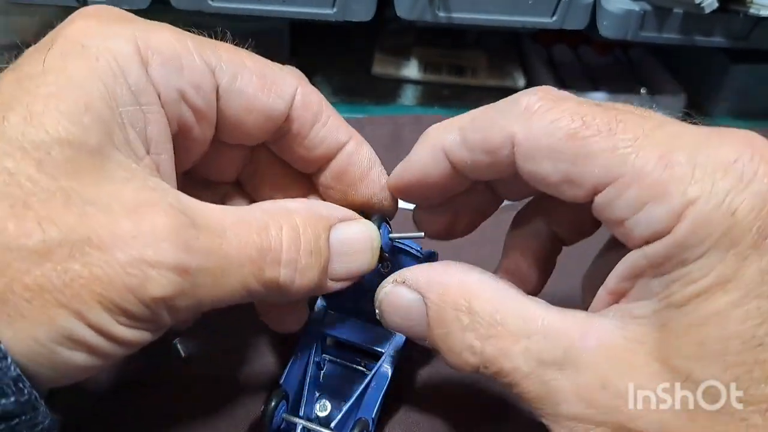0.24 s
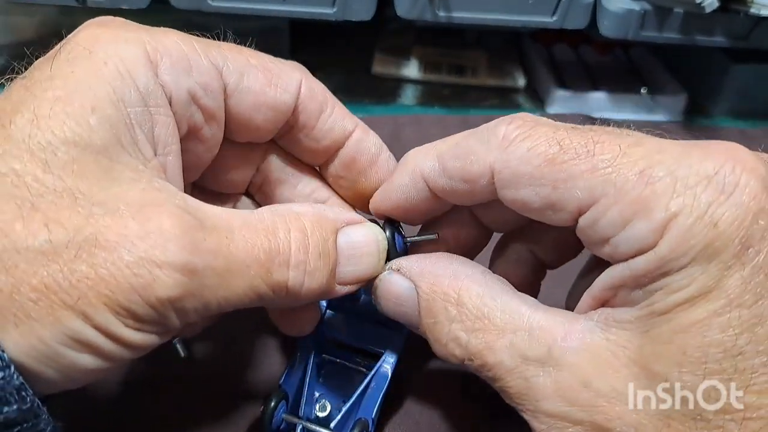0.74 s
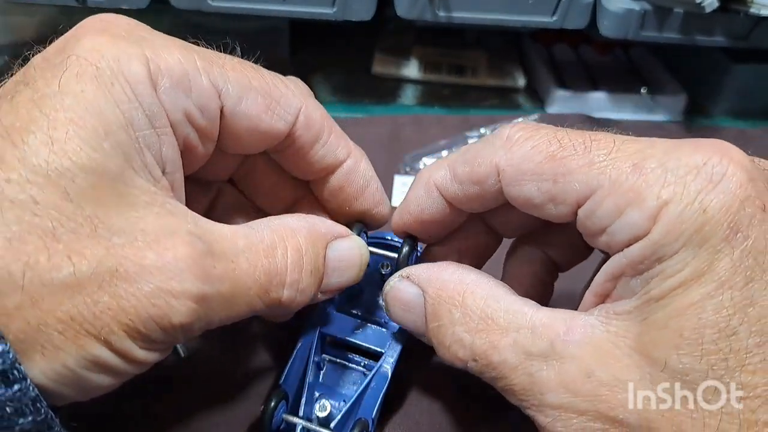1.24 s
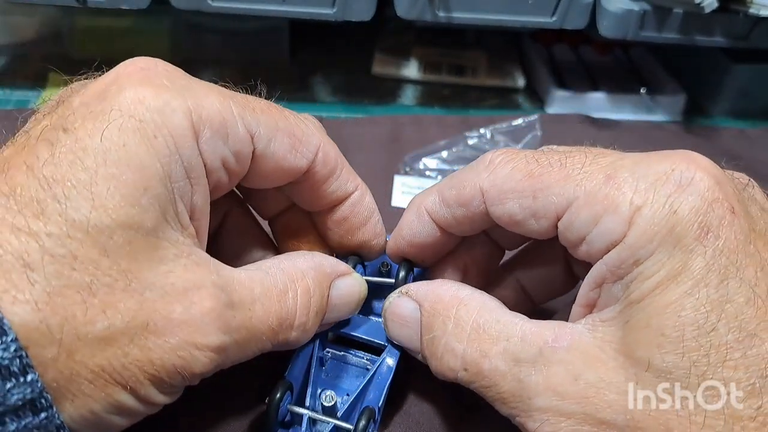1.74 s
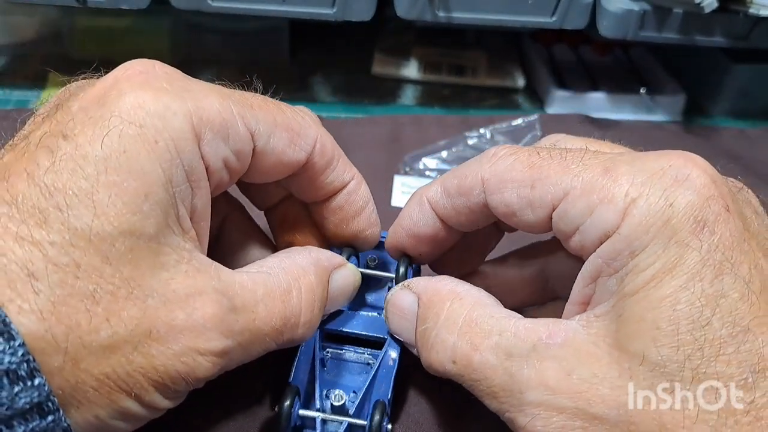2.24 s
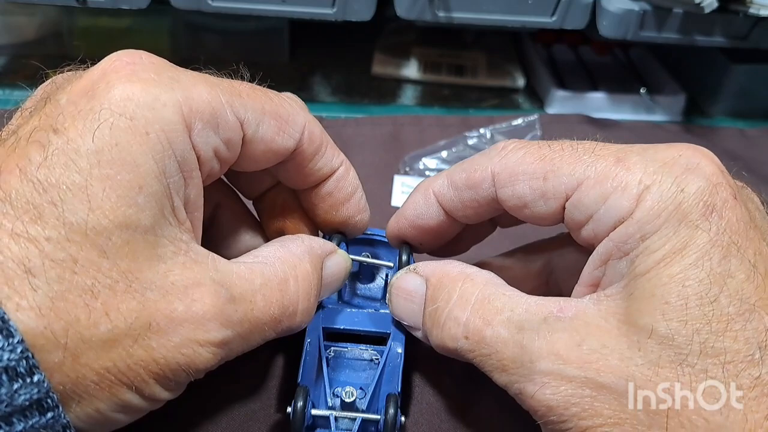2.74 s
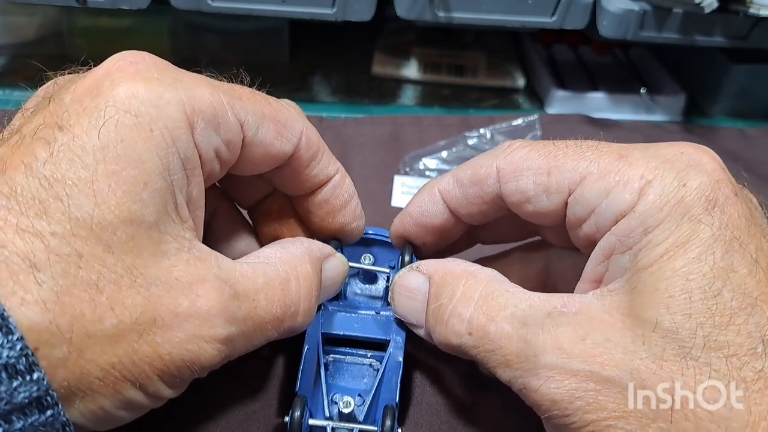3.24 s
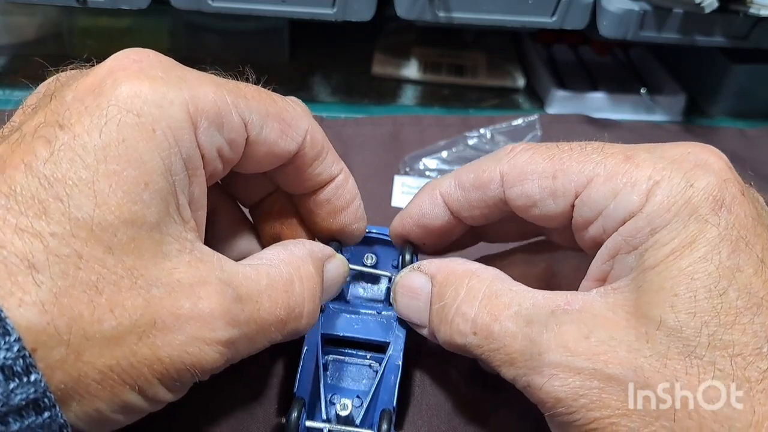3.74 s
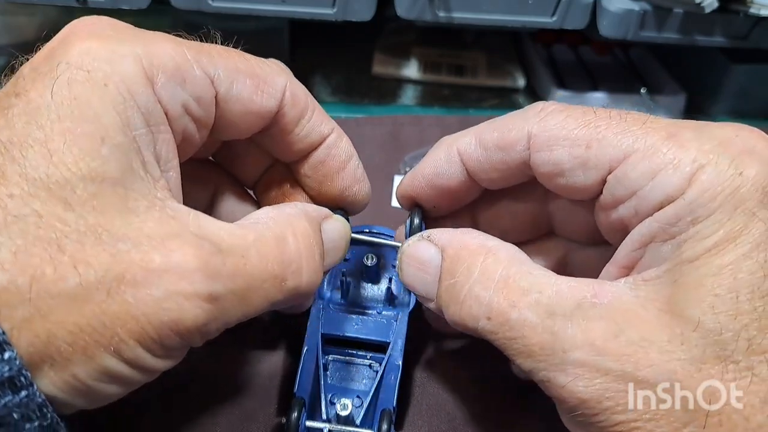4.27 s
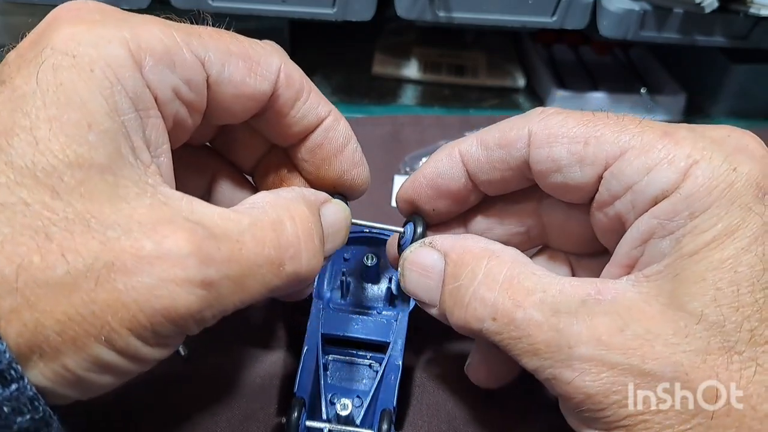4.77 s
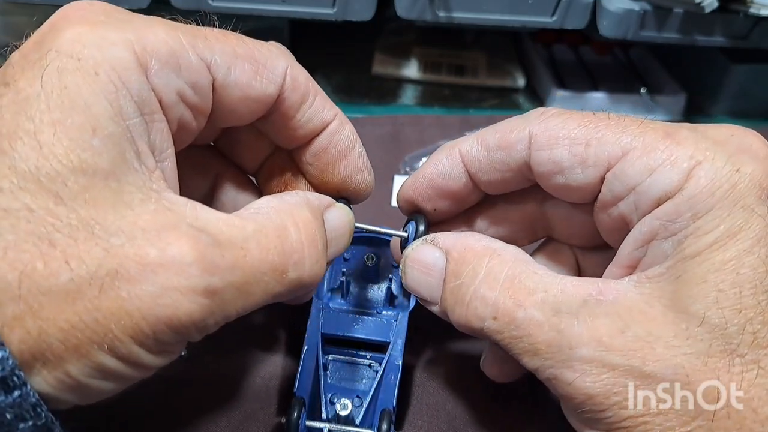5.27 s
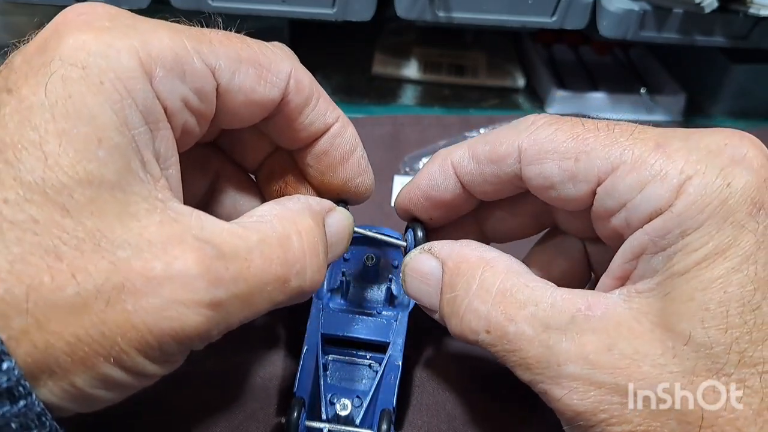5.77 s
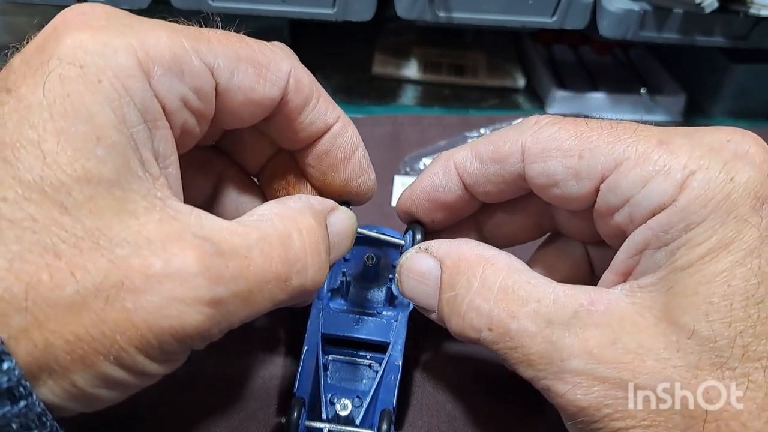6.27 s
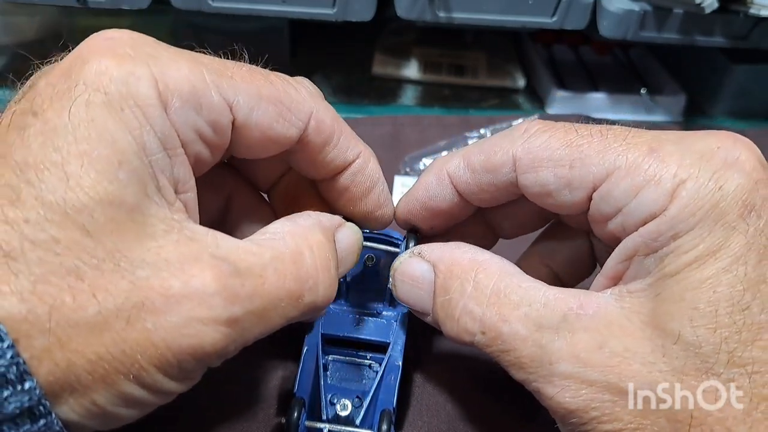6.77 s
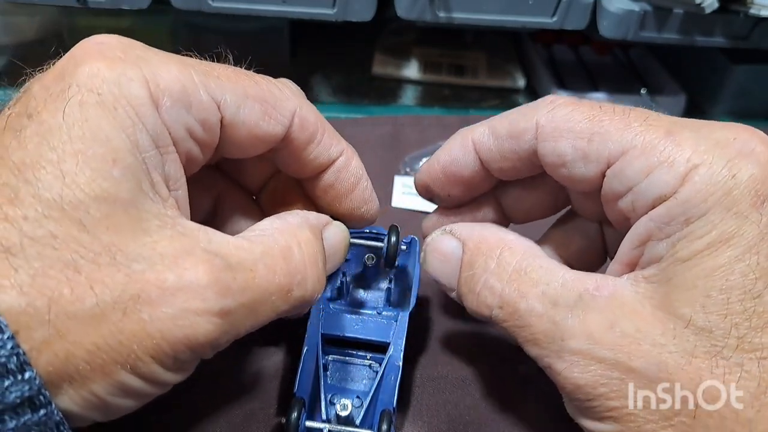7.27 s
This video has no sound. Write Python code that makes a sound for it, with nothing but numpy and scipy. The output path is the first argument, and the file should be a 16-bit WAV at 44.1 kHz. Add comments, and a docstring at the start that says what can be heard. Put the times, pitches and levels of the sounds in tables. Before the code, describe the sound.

Heavy rain drums and patters on a shed roof while small plastic parts tick at a workbench and fat drips ring a panel.

```python
"""Heavy rain on a shed roof, heard at a workbench underneath, in a small, dry room.
From the start, random drops drum and patter over a faint hiss, and big drops slap the roof: noise plus short notes.
The rain eases; a little after 1 s, plastic parts of a model car begin to tick as a wheel is pressed on:
bursts of noise and ringing sines. From about 2.3 s, fat drips also make a panel ring with sinking notes.
After about 3 s the rain swells unevenly and is strongest at the end."""
import sys
import numpy as np
from scipy import signal
from scipy.fft import rfft, irfft, next_fast_len
from scipy.io import wavfile

SR = 44100
rng = np.random.default_rng(int(sys.argv[2]) if len(sys.argv) > 2 else 0)


def materialize(psi):
    """Save the field psi as 16-bit PCM at rate SR to the path in sys.argv[1].

    A 1-D psi becomes a single channel; in a 2-D psi each row is a channel.
    """
    bounded = np.clip(np.atleast_2d(psi).T, -1, 1)
    quanta = np.round(bounded * 32767).astype(np.int16)
    wavfile.write(sys.argv[1], SR, quanta)


N = 331191

# Colour tables give the balance between pitches; their level/dB is per Hz and relative.
# strength of the shower: [t/s, level/dB], where USUAL_DB counts as usual
RAIN = [(0.0, -48), (0.54, -49), (0.84, -50), (1.27, -49.5), (1.63, -50), (1.72, -55), (2.53, -58),
        (2.72, -54.5), (2.81, -60), (2.92, -53.5), (3.07, -54), (3.43, -51), (3.6, -54.5), (3.72, -56.5),
        (3.81, -48.5), (3.87, -54.5), (3.99, -49.5), (4.16, -53), (4.27, -55), (4.33, -53.5), (4.46, -49),
        (4.55, -53.5), (4.62, -50.5), (4.79, -48), (4.83, -53), (4.9, -50), (5.46, -48), (5.75, -52.5),
        (5.96, -46), (6.11, -47), (6.63, -47), (7.51, -43.5)]
# deep drumming of the roof, colour: [f/Hz, level/dB]
DRUM = [(25, -23), (50, -4), (80, -6), (115, -1.5), (155, -0.5), (200, 2.5), (270, -4), (345, 3), (420, -4),
        (520, -9), (800, -17), (1600, -49.5)]
# patter in the middle range, colour: [f/Hz, level/dB]
PATTER = [(300, -20.5), (520, -9), (760, -6), (1020, 4.5), (1200, 4), (1450, 0), (1850, 4), (2700, -1.5),
          (3400, -9.5), (5000, -24), (9000, -69)]
# bright spray, colour: [f/Hz, level/dB]
SPRAY = [(1500, -3.5), (3200, 2.5), (5000, 1.5), (6300, -6.5), (7900, -9), (8900, -24), (12500, -24),
         (16000, -30)]
# ring of nearer drops at each pitch: [f/Hz, relative level/dB]
PLIP = [(600, -10.5), (1000, 0.5), (1400, -2.5), (1850, 4.5), (2600, -5.5), (3600, -5)]
# likeness of the two ears, 1 = identical: [f/Hz, coherence]
LIKENESS = [(60, 0.97), (140, 1), (300, 0.91), (450, 0.55), (640, -0.21), (1400, -0.096), (3000, 0.0044),
            (15000, -0.01)]
# big drops slapping the roof; the levels are relative to other rows, and slaps() trims each part:
# [t/s, slap level/dB, thump level/dB, spatter time/s, plip f/Hz, plip level/dB, plip left-right/dB]
SLAPS = [(0.204, -37.5, -37.5, 0.21, 1020, -50, -4), (0.325, -47, -69, 0.2, 1820, -27, -5),
         (0.351, -46, -63, 0.082, 2400, -39, -4), (0.3749, -42, -49, 0.18, 1820, -28.5, 0),
         (0.424, -41, -56, 0.18, 2740, -30, 0), (0.435, -50, -47.5, 0.14, 1220, -36, -2),
         (0.449, -42, -57, 0.14, 1700, -29, 0), (0.569, -37.5, -44.5, 1, 1862, -41, -1),
         (0.605, -43, -56, .2, 1300, -41, -3), (0.628, -47, -49, 0.19, 1604, -40, 1),
         (0.764, -56, -50.5, 0.09, 960, -68, -6), (0.852, -52, -67, 0.088, 1900, -38, -4),
         (0.984, -45.5, -54, 0.15, 1090, -41, -3), (1.025, -48, -60, 0.11, 1900, -40, 1),
         (1.056, -42.5, -68, 0.022, 1800, -32, 0), (1.13, -44, -64, 0.12, 1510, -32, -3),
         (1.2208, -43.5, -61, 0.1, 1110, -30, 0), (1.294, -48, -46.5, 0.046, 1800, -34, -5),
         (1.3187, -43.5, -46, 0.07, 1250, -30.5, 6), (1.378, -55, -53, .12, 1170, -35, -5),
         (1.406, -43.5, -49, 0.089, 1410, -30, -7), (1.4095, -51, -46.5, 0.14, 1520, -26, -8),
         (1.681, -46.5, -58, 0.13, 1720, -40, -4), (1.7, -44, -45.5, 0.53, 1840, -46, -6),
         (1.77, -42, -46, 0.27, 980, -40, -1), (1.797, -48.5, -47.5, .13, 1035, -40, -4),
         (1.978, -39, -44, 0.12, 980, -39, -4), (1.993, -41, -44.5, 0.24, 940, -35.5, -13),
         (2.047, -45, -42.5, 0.16, 1340, -30.5, -10), (2.231, -42, -52.5, 0.22, 1010, -60, -2),
         (2.277, -45.5, -58, .18, 1590, -33, -10), (2.386, -45, -46, 0.24, 1000, -36.5, -6),
         (2.408, -41.5, -41, 0.18, 1820, -37, -16), (2.527, -58, -49, 0.15, 1090, -56, -3),
         (2.6, -50, -51, 0.13, 1310, -46, -6), (2.681, -53, -61, 0.071, 2400, -47, -4),
         (2.705, -53, -56, 0.11, 1200, -42, -1), (2.8354, -51, -66, 0.28, 1150, -29.5, -5),
         (2.884, -45, -50, 0.11, 1808, -37, -15), (2.981, -54, -52.5, .12, 1200, -48, -2),
         (3.044, -47, -53, 0.067, 1410, -34.5, 0), (3.087, -50, -46, 0.054, 720, -48, -8),
         (3.263, -64, -59, .041, 1520, -38, -14), (3.301, -38, -49, 0.16, 1620, -42, -9),
         (3.404, -44, -46.5, 0.11, 1240, -38, 3), (3.472, -40, -51, 0.063, 1800, -32, -13),
         (3.481, -40.5, -44, 0.47, 1680, -29, -3), (3.55, -42.5, -46.5, 0.4, 1120, -35, -4),
         (4.096, -47, -48.5, 0.23, 1090, -41, -12), (4.364, -47, -62, 0.089, 1720, -40, 6),
         (4.401, -55, -60, .08, 1380, -43, -1), (4.586, -43, -45, 0.22, 1220, -40, -6),
         (4.608, -38.5, -47, 0.074, 1630, -23, -9), (4.767, -43.5, -47.5, 0.17, 1640, -46, 7),
         (4.849, -45.5, -49, .12, 1290, -50, -3), (4.903, -44.5, -51, 0.12, 1420, -30, -5),
         (4.925, -40.5, -43.5, 0.92, 1620, -35, 4), (4.942, -45, -50.5, 0.12, 920, -33, -6),
         (5.071, -47, -51.5, 0.053, 1780, -27.5, 0), (5.268, -45.5, -51.5, .06, 1890, -36, -7),
         (5.312, -46, -52, .08, 1700, -38, -4), (5.333, -40, -46.5, 0.15, 1100, -40, 6),
         (5.44, -45.5, -70, 0.055, 910, -40, 9), (5.586, -43, -47, 0.21, 1900, -32, -5),
         (5.641, -43, -47.5, 0.65, 710, -46, -10), (5.706, -39, -44.5, 0.28, 1780, -32, 2),
         (5.916, -41.5, -41.5, 0.23, 1200, -31, -3), (6.116, -47, -46, 0.12, 1060, -57, -3),
         (6.201, -49, -56, 0.097, 1520, -40, -2), (6.322, -39, -44.5, 0.44, 1000, -34, -5),
         (6.428, -36, -44.5, 0.41, 1300, -45, 5), (6.613, -33, -40.5, 1, 2045, -48, -5),
         (6.66, -40.5, -45, 0.21, 2100, -36, -6), (6.699, -43.5, -47, 0.21, 900, -35, -9),
         (6.865, -42.5, -46, 0.16, 1120, -38, -6), (6.977, -64, -54, 0.088, 940, -37.5, -7),
         (7.031, -42, -44, 0.26, 1190, -41, -6), (7.2175, -37.5, -62, .09, 974, -29, -6),
         (7.264, -38, -45.5, 0.14, 1940, -28, -3)]
# thump of the roof under a big drop, colour: [f/Hz, level/dB]
THUMP = [(50, -11), (90, -9.5), (120, -3), (155, 3.5), (200, -0.5), (270, -4), (345, -5), (430, -2),
         (520, -12), (800, -16.5), (1600, -37)]
# fat drips that make a panel ring; the hum level is relative to other rows, and drips() trims it:
# [t/s, note level/dB, starting f/Hz, settled f/Hz, left-right/dB, ring time/s, hum level/dB,
#  knock level/dB, overtone f/Hz, overtone level/dB, low body f/Hz, low body level/dB]
DRIPS = [(2.2752, -26.5, 461, 342, -1, 0.18, -45, -38, 1080, -42, 248, -31),
         (2.2871, -33, 436, 370, -2, 0.067, -55, -46, 1070, -40, 244, -53),
         (2.8354, -38.5, 840, 690, -2, 0.008, -60, -47.5, 1176, -37, 244, -62),
         (3.087, -35.5, 450, 377, -1, 0.17, -56, -52, 1050, -48, 173, -39),
         (3.9096, -39, 420, 343, -4, 0.15, -29.5, -39, 775, -32, 241, -37),
         (4.097, -39.5, 440, 312, -3, 0.06, -43, -41.5, 1120, -39, 198, -43),
         (4.4925, -32, 754, 635, -7, 0.043, -38, -35.5, 970, -39, 226, -41),
         (4.6057, -22.5, 405, 336, -2.5, 0.084, -41, -29, 800, -27, 175, -34),
         (4.6306, -24, 370, 318, -2, 0.059, -33, -44, 1050, -45, 238, -30.5),
         (4.923, -28, 510, 375, -3, 0.15, -32, -39, 1280, -29.5, 162, -40.5),
         (5.4417, -38, 563, 415, -1, 0.14, -52, -40, 950, -34, 200, -54),
         (5.642, -38, 570, 418, -3, 0.093, -42, -55, 720, -47, 244, -47),
         (6.116, -34.5, 370, 300, -3, 0.076, -33, -51, 1060, -51, 240, -48),
         (6.815, -36.5, 350, 269.3, -4.5, 0.13, -51, -42.5, 1110, -46, 203, -36)]
# knock of a drip on the panel, colour: [f/Hz, level/dB]
KNOCK = [(150, -36.5), (240, 2), (350, -3.5), (490, -4), (620, -5.5), (760, -9), (1020, -8.5), (1400, -20),
         (2500, -42.5)]
# ways the roof panel hums: [f/Hz, level/dB, time to fall 60 dB/s]
PANEL = [(239, 3.5, 0.034), (339, 2.5, 0.07), (412, -1.5, 0.05)]
# plastic ticks at the bench; the tick level is relative to other rows, and ticks() trims it:
# [t/s, tick level/dB, left-right/dB, ring f/Hz, ring level/dB, sizzle level/dB, rattle time/s]
TICKS = [(1.2195, -52, -14, 4600, -46, -85, 0.11), (1.926, -48, -3, 5200, -58, -82, 0.24),
         (2.274, -46.5, -7, 5460, -50, -62, 0.27), (2.39, -48, -10, 6500, -45.5, -68, 0.25),
         (2.5961, -50, -3.5, 4800, -41, -66, 0.27), (2.885, -52.5, -13, 2800, -47, -80, 0.14),
         (2.962, -55, -6, 7660, -50, -79, .08), (2.9809, -39.5, -5, 4390, -42, -57, 0.18),
         (3.2, -52, -4, 4800, -51, -85, .14), (3.298, -40, -3, 3200, -37, -67, .2),
         (3.365, -44, -6, 5680, -48, -70, 0.24), (3.403, -40, -6, 5000, -36, -60, .22),
         (3.5783, -51, -7, 6030, -46, -74, 0.14), (3.808, -55, 2, 2840, -44, -82, .16),
         (3.905, -44, -9, 4480, -39.5, -85, 0.14), (4.0999, -39.5, -4.5, 5360, -32.5, -52.5, 0.2),
         (4.207, -49, -4, 4740, -49, -70, 0.18), (4.377, -50, -3, 5340, -46.5, -74, .16),
         (4.4532, -43.5, -6, 5250, -43, -80, 0.25), (4.492, -40.5, -11.5, 4910, -44, -71, 0.12),
         (4.589, -42, -8, 7700, -43, -68, 0.22), (4.6304, -45, -5, 4650, -36.5, -63, 0.22),
         (4.7076, -40, -4, 5510, -44, -59, 0.11), (5.0514, -45, -6, 5340, -44, -62, 0.14),
         (5.268, -62, -2, 6000, -57, -74, .08), (5.307, -53, -9, 4620, -47, -85, .12),
         (5.43, -52, -3, 5500, -50, -76, .12), (5.6236, -52, -8, 8010, -46.5, -72, .16),
         (5.674, -50, -5, 6000, -47, -70, 0.14), (5.94, -55, -1, 4700, -40, -72, 0.18),
         (6.202, -61, 1, 4500, -52, -85, .1), (6.431, -47, -3, 2950, -37.5, -80, .14),
         (6.5511, -38, -12.5, 4230, -34.5, -70, 0.1), (6.591, -42, -5, 6500, -46, -76, 0.15),
         (6.6175, -42, 0, 4600, -37.5, -59, .22), (6.7767, -41, -2, 4010, -35, -80, 0.33),
         (6.862, -48, -1, 5400, -41, -64, 0.12), (7.317, -41, -5, 5200, -43, -80, 0.18)]
# first instant of a tick, colour: [f/Hz, level/dB]
CRACK = [(2500, -1.5), (4000, 7), (6500, 1), (8000, 1), (9000, -16.5), (13000, -18.5), (16000, -26)]
# sharp body of a tick, colour: [f/Hz, level/dB]
TICK = [(900, 8.5), (2500, 6), (3600, -2), (5000, 2), (6500, -3), (8000, -7.5), (9000, -32), (12000, -38),
        (16000, -52)]
# sizzle on top of a tick, colour: [f/Hz, level/dB]
SIZZLE = [(5000, -12), (7600, 10), (9000, -2), (11000, -0.5), (13000, -6), (16000, -33)]

TIME = np.arange(N) / SR
AGE = np.arange(SR // 4) / SR   # time since a blow, in seconds
ROOM_T60_S = 0.15   # time for the room's tail to fall 60 dB
HISS_DB, CUTOFF_HZ = -77, 15900
EAR_LAG_S = 0.000478   # the longest delay of a sharp sound at the left side
USUAL_DB = -52.5   # usual strength on the RAIN scale
# rain layers, before flurries and pan: (dB at the usual strength, dB gained per dB of strength)
DRUM_LAW, PATTER_LAW = (-54, 0.94), (-55.5, 1.0)
PLIP_LAW, SPRAY_LAW = (-56.5, 0.95), (-63.5, 0.96)
SPLASH_DB, SLAP_SIDE_DB = -10.5, -4.5   # splash of every big drop; left-right of slap and splash
# lesser drops: middle levels on the SLAPS scale, at the usual strength
SMALL_SLAPS_PER_S, SMALL_SLAP_DB, SMALL_THUMP_DB = 3.3, -52.5, -55.5
GRAIN_PER_S, GRAIN_DB = 450, 2.5   # spatter and rattle come in tiny uneven grains
SAG_S, HOLD_S = 0.0073, 0.0046   # a drip's note sinks this quickly, and holds this long before dying
BODY_T60_S, BODY_RISE_S = 0.11, 0.0035   # the panel's lowest mode, struck directly


def from_db(db):
    """Turn decibels into a gain."""
    return 10 ** (np.asarray(db) / 20)


def rms_one(x):
    """Scale to an average strength (rms) of 1."""
    return x / np.sqrt(np.mean(x ** 2) + 1e-20)


def at_hz(points, hz):
    """Read a table between its points, with pitch on a log scale."""
    f, value = np.transpose(points)
    return np.interp(np.log(hz + 1), np.log(f), value)


def pan(db):
    """Left and right gains that differ by db; positive means louder on the left."""
    return from_db(np.array([[db], [-db]]) / 2)


def decay(t60):
    """Fading that falls 60 dB in t60 seconds, or in 2 ms if t60 is shorter."""
    return from_db(-60 * AGE / max(t60, .002))


def bloom(rise_s):
    """Soft start of a ring."""
    return 1 - np.exp(-AGE / max(rise_s, 1e-5))


def add(out, s, sound):
    """Mix a stereo sound in at time s."""
    i = max(round(s * SR), 0)
    out[:, i:i + sound.shape[1]] += sound[:, :N - i]


def colour(x, spectrum):
    """Filter with a colour table, reacting as promptly as possible (minimum phase)."""
    size = 2 * next_fast_len(x.shape[-1] // 2 + 2048)
    hz = np.arange(size // 2 + 1) * SR / size
    # fade out beyond both ends of the table
    top_fade = 1 / (1 + (hz / spectrum[-1][0] / 2) ** 2)
    bottom_fade = 1 / (1 + (spectrum[0][0] / 2 / (hz + 1)) ** 2)
    gain = from_db(at_hz(spectrum, hz)) * top_fade * bottom_fade
    # folding the cepstrum forward in time leaves nothing before the blow
    cepstrum = irfft(np.log(gain))
    cepstrum[1:size // 2] *= 2
    cepstrum[size // 2 + 1:] = 0
    return irfft(rfft(x, size) * np.exp(rfft(cepstrum)))[..., :x.shape[-1]]


def diffuse(count):
    """Stereo noise from all around: alike in the bass, nearly unrelated in the treble."""
    size = 2 * next_fast_len(count // 2 + 1)
    mid, side = np.exp(2j * np.pi * rng.random((2, size // 2 + 1)))
    alike = np.clip(at_hz(LIKENESS, np.arange(len(mid)) * SR / size), -1, 1)
    shared = np.sqrt(1 + alike) * mid
    opposed = np.sqrt(1 - alike) * side * [[1], [-1]]
    return rms_one(irfft(shared + opposed)[:, :count])


def grains():
    """Gain of a crackling tail: it swings at random every few milliseconds; rms 1."""
    knots = np.clip(rng.standard_normal(400), -2, 2)
    return rms_one(from_db(GRAIN_DB * np.interp(AGE * GRAIN_PER_S, np.arange(len(knots)), knots)))


def blow(spectrum, t60, tail_db, tail_s=ROOM_T60_S):
    """One impact: fading noise for a crowd of ringing modes, plus a grainy tail."""
    fading = decay(t60) + from_db(tail_db) * decay(tail_s) * grains()
    sound = colour(diffuse(len(AGE)) * fading, spectrum)
    # the energy of 10 ms at unit level
    return rms_one(sound) * np.sqrt(SR / 100 / len(AGE))


def note(hz, t60, lag_s):
    """A struck mode in stereo: a dying sine that reaches the left lag_s late, or the right if negative."""
    age = np.maximum(AGE - np.array([[max(lag_s, 0)], [max(-lag_s, 0)]]), 0)
    return np.sin(2 * np.pi * hz * age) * from_db(-60 * age / t60)


def pock(hz, cycles, lag_s, low=0.615, low_db=-5, high=1.438, high_db=-9.0):
    """A drop on the sheet: three unrelated modes that ring for a few cycles."""
    low_hz = hz * low * rng.uniform(0.905, 1.136)
    high_hz = hz * high * rng.uniform(0.88, 1.107)
    t60 = cycles / hz
    main = note(hz, t60, lag_s)
    # the two other modes start in the opposite direction
    return main - from_db(low_db) * note(low_hz, t60, lag_s) - from_db(high_db) * note(high_hz, t60, lag_s)


def reflected(sound, echo_db=-11.5, first_s=0.00284, last_s=0.02, count=4):
    """A ring with a few early echoes off the nearby walls, different on each side."""
    out = sound.copy()
    for side in range(2):
        lags = SR * (first_s + (last_s - first_s) * rng.random(count))
        for lag in lags.astype(int):
            out[side] += from_db(echo_db) * np.roll(sound[side], lag)
    return out


def hiss():
    """A faint even hiss: plain random noise on each side."""
    return from_db(HISS_DB) * rng.standard_normal((2, N))


def strength(s):
    """How far the shower is above its usual strength at time s, in dB."""
    return np.interp(s, *np.transpose(RAIN)) - USUAL_DB


def flurries(per_s, depth_db, evening=0.11):
    """Drops come in clumps: a randomly swinging gain, steadier in a dense shower."""
    knots = np.tanh(rng.standard_normal(1000))
    swing = np.interp(TIME * per_s, np.arange(len(knots)), knots)
    return from_db(depth_db * np.exp(-evening * strength(TIME)) * swing)


def shower(spectrum, per_s, spread_db, t60, room_db, wash_db, count=14):
    """Uneven drops land at random on patches of roof, each with its own ring, over a wash of far ones."""
    out = np.zeros((2, N))
    for patch in range(count):
        sizes = from_db(spread_db * np.minimum(rng.exponential(1, N), 3)) * rng.choice([-1, 1], N)
        drops = sizes * (rng.random(N) < per_s / count / SR)
        ring = blow(spectrum, t60, room_db) * pan(rng.normal(0, 2.1))
        out += signal.oaconvolve(drops[None], ring, axes=1)[:, :N]
    wash = rms_one(colour(diffuse(N), spectrum))
    return rms_one(rms_one(out) + from_db(wash_db) * wash)


def plips(per_s=200, spread_db=3.0, cycles=23.7, tail_db=-0.5, count=40):
    """Nearer drops give short pocks with a room tail; each pitch has its own delay between the ears."""
    out = np.zeros((2, N))
    for hz in np.geomspace(PLIP[0][0], PLIP[-1][0], count):
        direct = pock(hz, cycles, EAR_LAG_S * rng.uniform(-0.41, 1.0)) * bloom(0.00069)
        room = diffuse(len(AGE)) * decay(ROOM_T60_S)
        tail = signal.fftconvolve(direct, room, axes=1)[:, :len(AGE)]
        drop = from_db(at_hz(PLIP, hz)) * (rms_one(direct) + from_db(tail_db) * rms_one(tail))
        lands = np.flatnonzero(rng.random(N) < per_s / count / SR)
        sizes = np.minimum(rng.exponential(1, N)[lands], 2.5)
        for i, size in zip(lands, sizes):
            add(out, i / SR, from_db(spread_db * size) * drop)
    return rms_one(out)


def rain():
    """The roof drums low, patters in the middle and lets spray through, all following the shower."""
    swell, clumps = strength(TIME), flurries(per_s=24, depth_db=2.5)
    laws = (DRUM_LAW, PATTER_LAW, PLIP_LAW, SPRAY_LAW)
    drum, patter, near, spray = [clumps * from_db(db + follows * swell) for db, follows in laws]
    drum = drum * flurries(per_s=23, depth_db=-2.35) * pan(-1.8)
    drum = drum * shower(DRUM, per_s=130, spread_db=4.0, t60=0.074, room_db=-12.0, wash_db=-4.0)
    near = near * plips() * pan(-0.0028)
    patter = patter * pan(-5.5)
    patter = patter * shower(PATTER, per_s=330, spread_db=5.0, t60=0.035, room_db=-3.5, wash_db=-6.5)
    spray = spray * pan(-6.5)
    spray = spray * shower(SPRAY, per_s=800, spread_db=7.0, t60=0.02, room_db=-6.0, wash_db=-4.5)
    return drum + patter + near + spray


def small_slaps(spread_db=5.0, spatter_s=0.094, follows=0.4):
    """Rows like SLAPS for lesser drops at random times, a little harder when the shower is strong."""
    rows = []
    count = int(SMALL_SLAPS_PER_S * N / SR)
    for k, (when, size, pitch, side) in enumerate(rng.random((count, 4))):
        s = (k + when) / SMALL_SLAPS_PER_S   # one in each equal slot of time
        db = follows * strength(s) + spread_db * (2 * size - 1)
        slap_db, thump_db = SMALL_SLAP_DB + db, SMALL_THUMP_DB + db
        hz = 950 * 2 ** pitch   # anywhere within one octave
        rows.append((s, slap_db, thump_db, spatter_s, hz, slap_db + 13.0, 2 * side * SLAP_SIDE_DB))
    return rows


def slaps(cycles=22.4, plip_rise_s=0.00071, plip_gain_db=-0.5):
    """A big drop gives a hollow pock, a splash, a slap of the sheet and a thump of the roof, then spatters."""
    out = np.zeros((2, N))
    for s, slap_db, thump_db, spatter_s, hz, plip_db, side_db in SLAPS + small_slaps():
        direct = pock(hz, cycles, EAR_LAG_S * rng.uniform(0.25, 1.0)) * bloom(plip_rise_s)
        plip = from_db(plip_db + plip_gain_db) * reflected(direct) * pan(side_db)
        slap = blow(PATTER, t60=.03, tail_db=1, tail_s=spatter_s)
        splash = blow(SPRAY, t60=0.022, tail_db=6, tail_s=spatter_s)
        thump = blow(THUMP, t60=.08, tail_db=12, tail_s=spatter_s)
        bright = from_db(slap_db) * (from_db(-2.0) * slap + from_db(SPLASH_DB) * splash)
        add(out, s, plip + bright * pan(SLAP_SIDE_DB) + from_db(thump_db + 6.0) * thump * pan(-1.7))
    return out


def sagging_note(hz, settled_hz, t60, beat_db=-1.8):
    """The note of a dented panel: it starts sharp, sinks, and swells unevenly as it dies away."""
    pitch = hz + (settled_hz - hz) * bloom(SAG_S)
    knots = np.tanh(rng.standard_normal(32))
    swell = from_db(beat_db * np.interp(AGE, np.linspace(0, AGE[-1], 32), knots))
    fade = from_db(-60 * np.maximum(AGE - HOLD_S, 0) / t60)
    return np.sin(2 * np.pi * np.cumsum(pitch) / SR) * fade * swell


def drips(hum_delay_s=0.01081, hum_rise_s=0.016, hum_db=7.0, overtone_t60_s=0.02, overtone_rise_s=0.0011):
    """A drip knocks out a sinking note, a low body and an overtone; the whole panel hums a moment later."""
    out = np.zeros((2, N))
    hum = sum(from_db(db) * note(hz, t60, 0) for hz, db, t60 in PANEL) * bloom(hum_rise_s)
    for row in DRIPS:
        s, db, hz, settled_hz, side_db, t60, panel_db = row[:7]
        knock_db, over_hz, over_db, body_hz, body_db = row[7:]
        body = from_db(body_db) * note(body_hz, BODY_T60_S, 0) * bloom(BODY_RISE_S)
        knock = from_db(knock_db) * blow(KNOCK, t60=.055, tail_db=-10)
        overtone = note(over_hz, overtone_t60_s, EAR_LAG_S * 0.38) * bloom(overtone_rise_s)
        main = from_db(db) * sagging_note(hz, settled_hz, t60)
        ring = reflected(from_db(over_db) * overtone + main)
        add(out, s, (knock + body + ring) * pan(side_db))
        add(out, s + hum_delay_s, from_db(panel_db + hum_db) * hum * pan(side_db))
    return out


def ticks(ring_t60_s=.011, slip_s=.005, slip_loss_db=2.5, crack_db=-14.0, upper=1.46, upper_db=-7.0):
    """Plastic parts slip and snap in the fingers: a crack, a ring that catches again twice, a short rattle."""
    out = np.zeros((2, N))
    for s, db, side_db, hz, ring_db, sizzle_db, rattle_s in TICKS:
        crack = from_db(ring_db + crack_db) * blow(CRACK, t60=.012, tail_db=-30)
        tick = from_db(db - 3.5) * blow(TICK, t60=.03, tail_db=-3, tail_s=rattle_s)
        sizzle = from_db(sizzle_db) * blow(SIZZLE, t60=.12, tail_db=4, tail_s=rattle_s)
        add(out, s, (crack + tick + sizzle) * pan(side_db))
        for k in range(3):   # the first ring, then two weaker catches
            pitch, lag_s = hz * rng.uniform(0.928, 1.065), EAR_LAG_S * rng.random()
            second = from_db(upper_db) * note(pitch / upper, ring_t60_s, lag_s)   # a lower mode
            ring = (note(pitch, ring_t60_s, lag_s) + second) * bloom(0.00064)
            catch_s = s + k * slip_s * rng.uniform(0.53, 1.4)
            add(out, catch_s, from_db(ring_db - slip_loss_db * k) * ring * pan(side_db))
    return out


def scene():
    """A faint hiss, the roof overhead, and hands at the bench."""
    return hiss() + rain() + slaps() + drips() + ticks()


def record(dry):
    """Cut the treble steeply above CUTOFF_HZ."""
    return signal.sosfilt(signal.ellip(10, .1, 70, CUTOFF_HZ, fs=SR, output="sos"), dry)


dry = scene()
out = record(dry)
materialize(out)
```